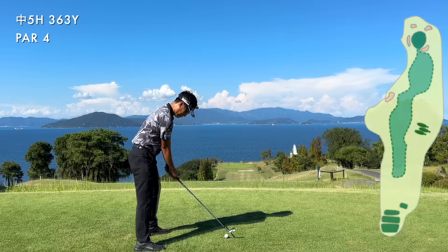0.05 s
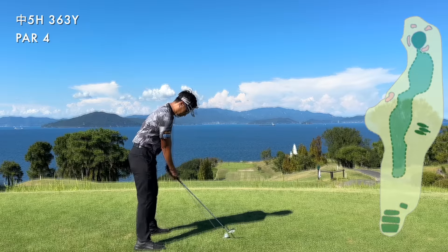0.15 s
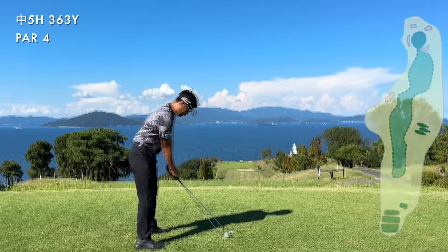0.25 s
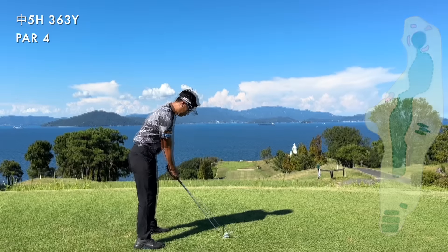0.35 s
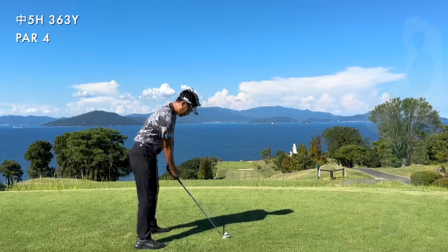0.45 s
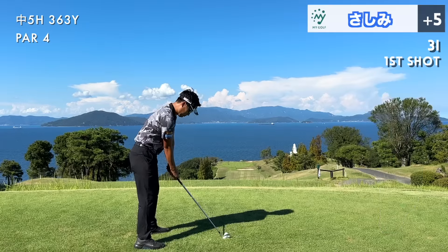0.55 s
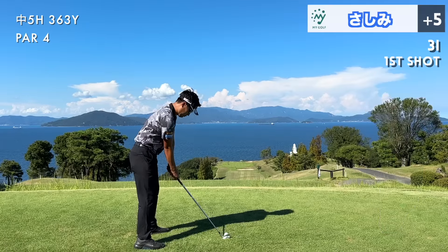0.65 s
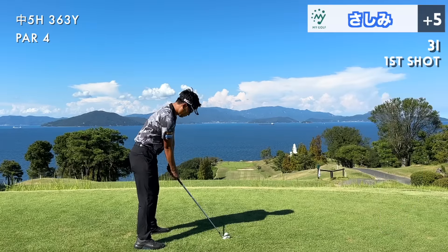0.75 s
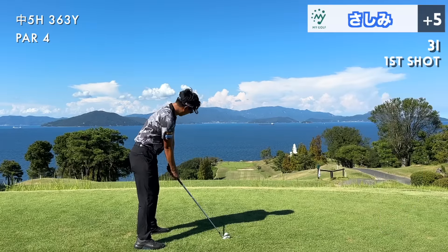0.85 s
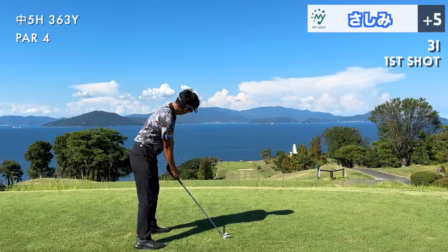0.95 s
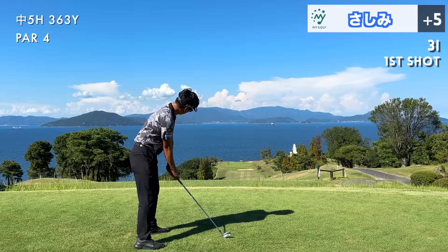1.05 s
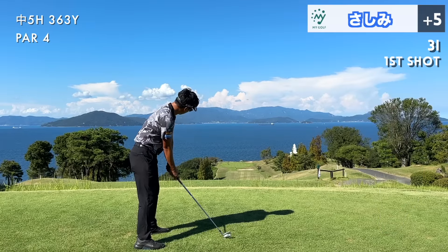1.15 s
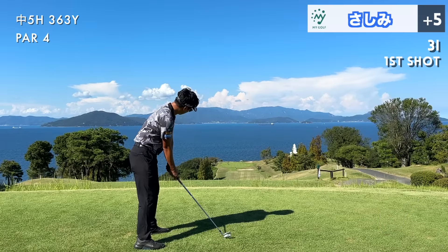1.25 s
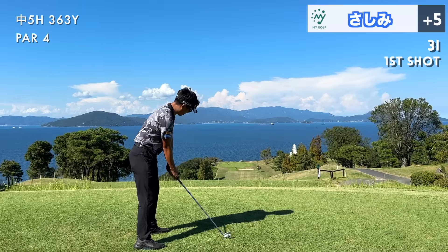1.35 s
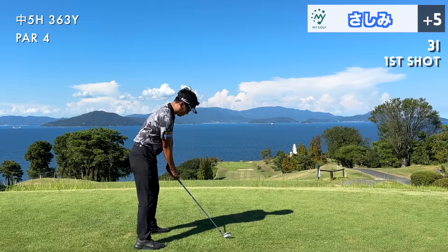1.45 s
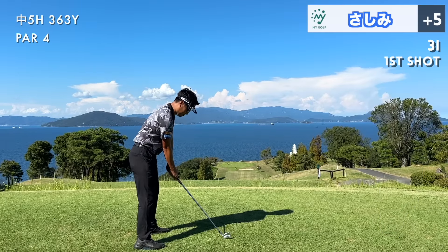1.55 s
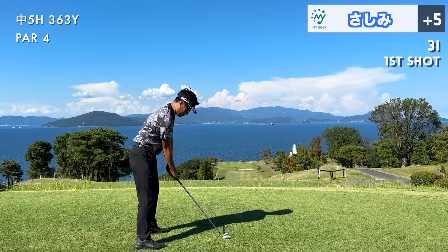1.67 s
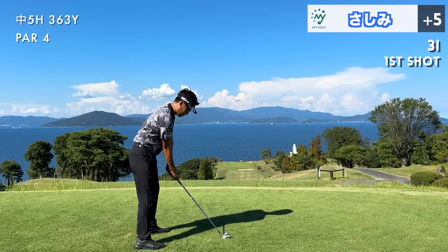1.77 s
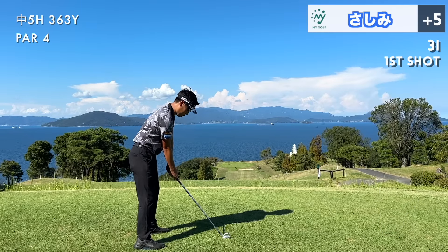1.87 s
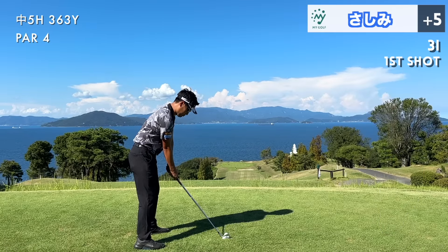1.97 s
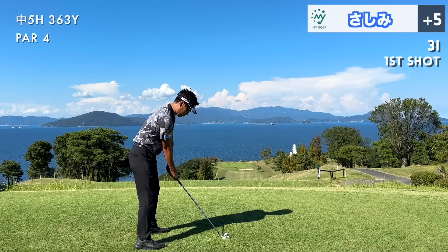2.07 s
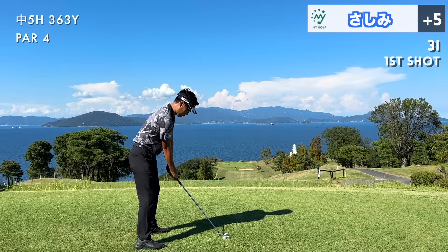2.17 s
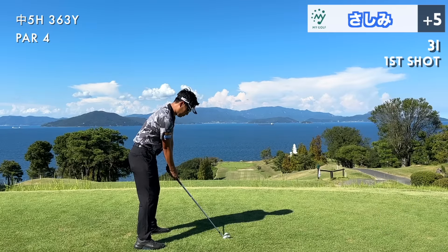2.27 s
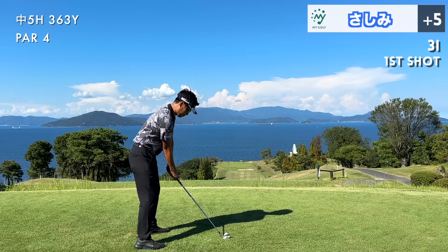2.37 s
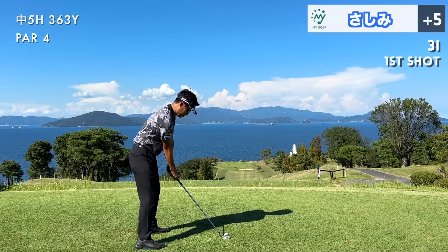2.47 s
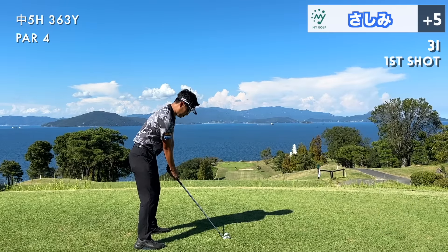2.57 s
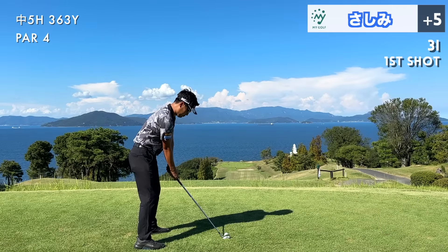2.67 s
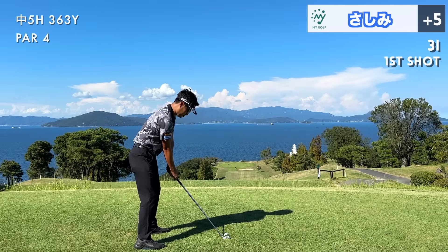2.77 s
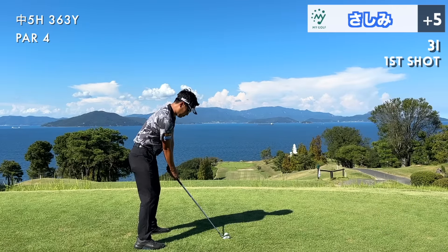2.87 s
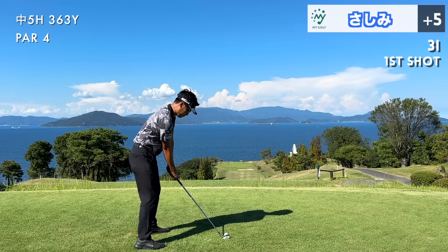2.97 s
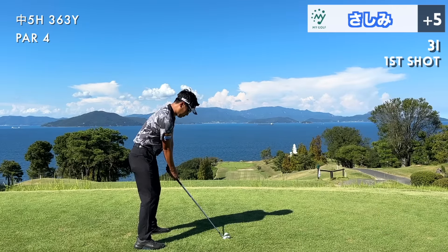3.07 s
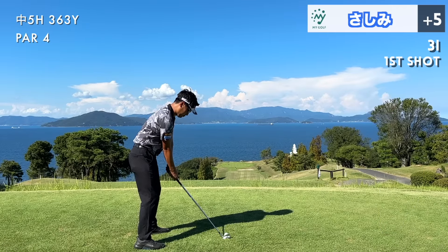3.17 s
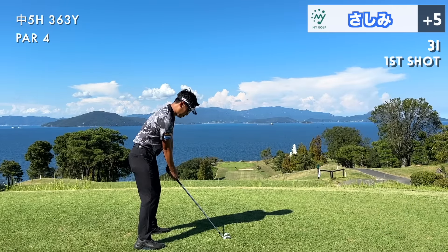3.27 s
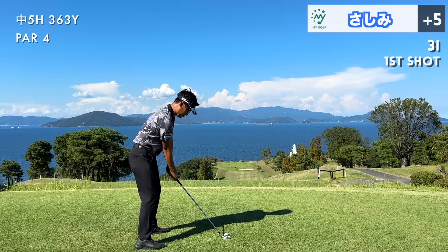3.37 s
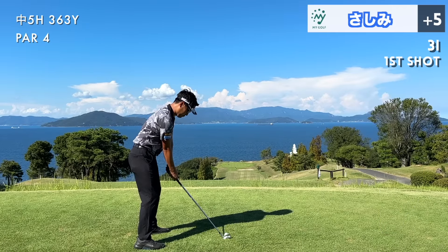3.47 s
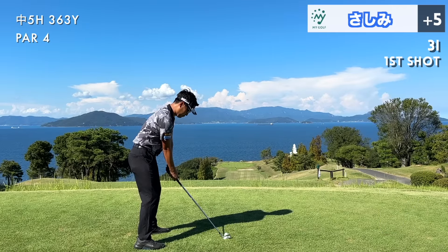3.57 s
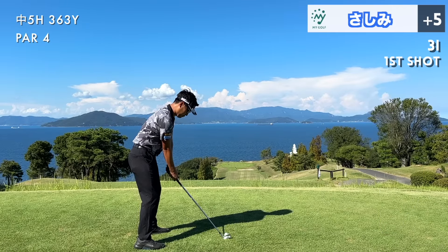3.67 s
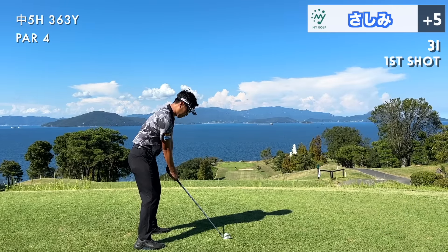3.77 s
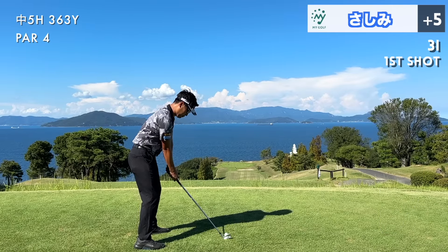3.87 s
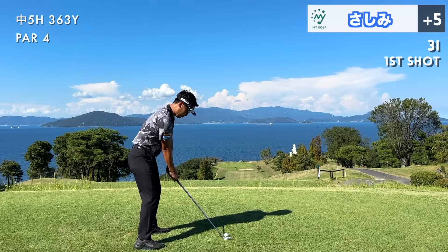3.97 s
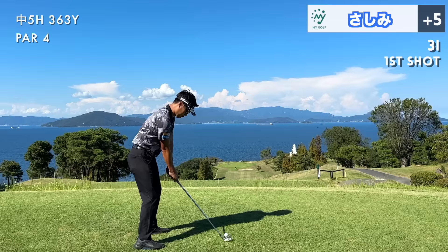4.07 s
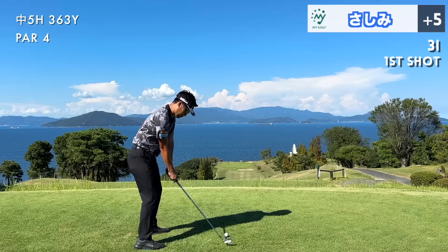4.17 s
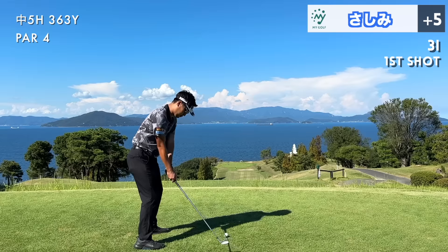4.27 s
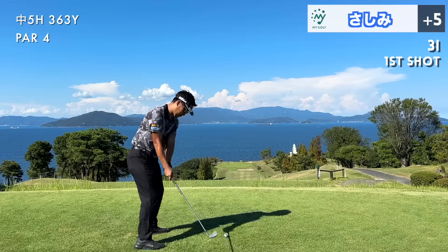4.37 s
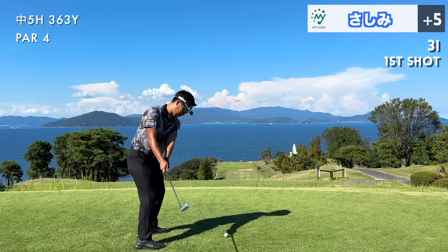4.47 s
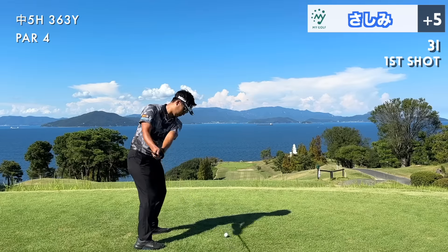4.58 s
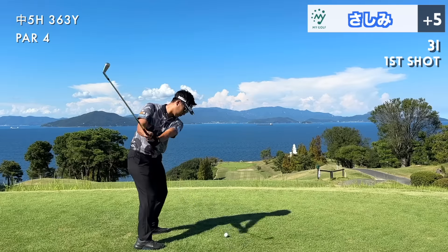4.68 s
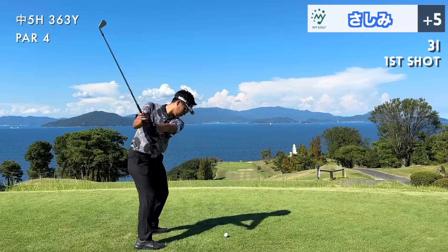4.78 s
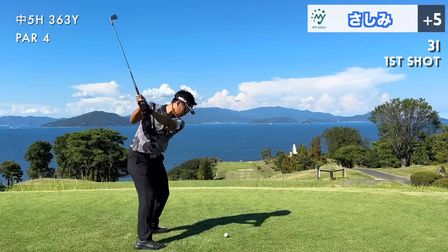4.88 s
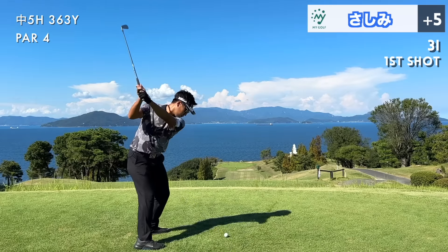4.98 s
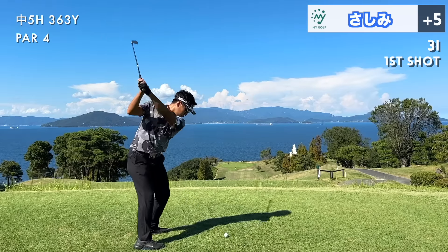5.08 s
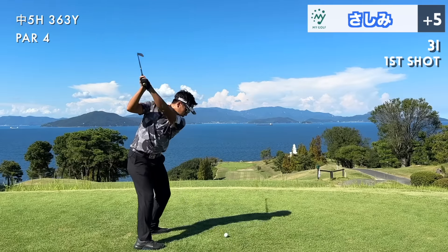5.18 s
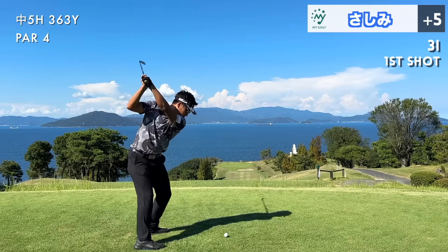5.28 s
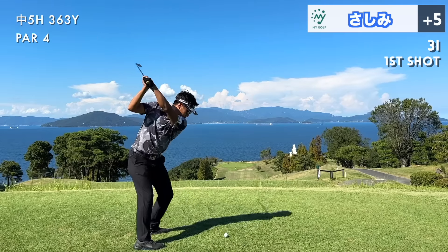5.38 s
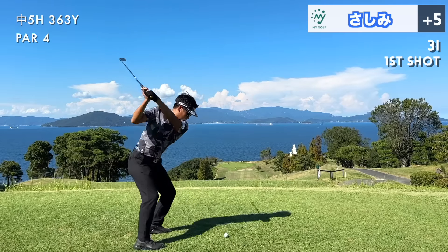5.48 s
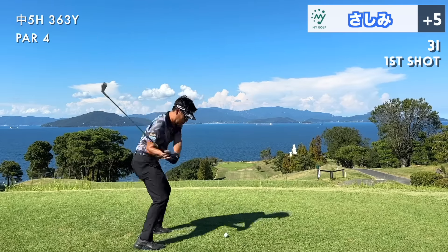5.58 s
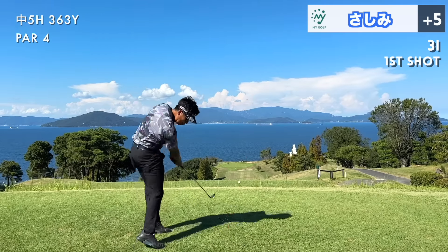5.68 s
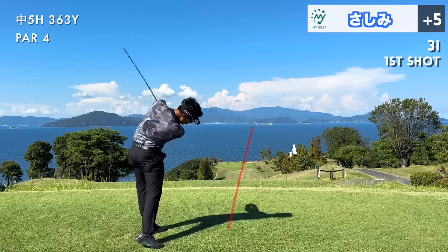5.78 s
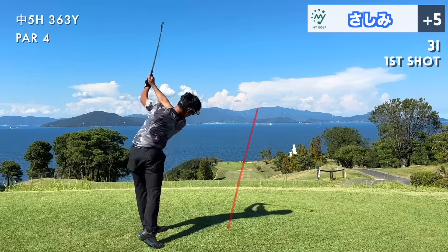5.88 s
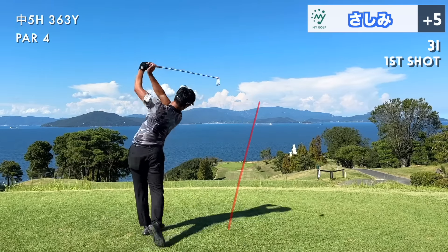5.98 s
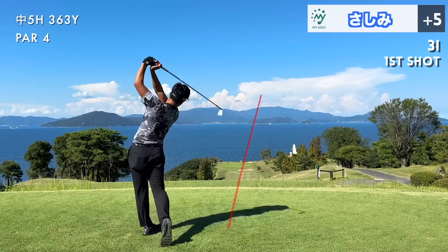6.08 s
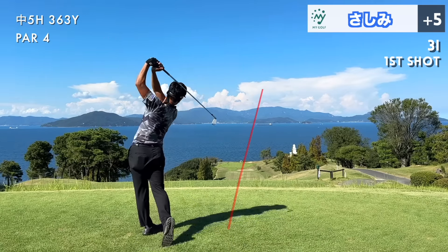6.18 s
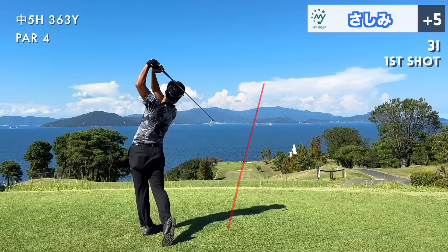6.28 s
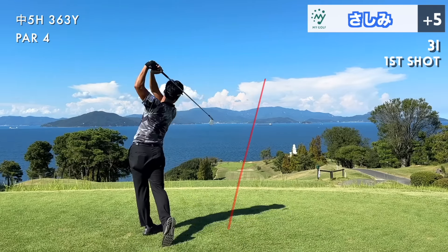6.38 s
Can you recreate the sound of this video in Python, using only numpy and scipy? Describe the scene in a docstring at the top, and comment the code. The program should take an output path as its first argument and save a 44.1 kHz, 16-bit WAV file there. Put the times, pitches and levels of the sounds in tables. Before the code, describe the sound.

Wind buffets the microphone outdoors until a golf club swishes down and hits the ball with one sharp, loud crack.

```python
"""An iron strikes a golf ball on a seaside tee: the ball knocks and the steel head rings under a crack
that overloads the microphone, and turf sprays. Leading in, clothes rustle through the backswing, then the
shaft swishes and the head whistles as they shed vortices. Gusts buffet the microphone throughout, over
a faint wash of sea and leaves and insects chirping in the grass."""
import sys
import numpy as np
from scipy import signal
from scipy.fft import rfft, irfft, next_fast_len
from scipy.io import wavfile
from scipy.ndimage import uniform_filter1d

SR = 44100
rng = np.random.default_rng(int(sys.argv[2]) if len(sys.argv) > 2 else 0)


def wrap_up_sound(samples):
    """Save the sound to the file named by the first command line argument, as 16-bit audio."""
    columns = np.atleast_2d(samples).T
    # keep every value between -1 and 1, then stretch to whole-number steps
    tamed = np.clip(columns, -1, 1)
    steps = np.round(tamed * 32767).astype(np.int16)
    wavfile.write(sys.argv[1], SR, steps)


N = 283783
TIME = np.arange(N) / SR
CONTACT_S, RELEASE_S = 5.6877, 5.6886   # the face meets the ball; the ball leaves it


def from_db(db):
    """Decibels to gain."""
    return 10 ** (np.asarray(db) / 20)


def rms_one(x):
    """Scale to unit rms."""
    return x / np.sqrt(np.mean(x ** 2) + 1e-20)


def drift(rate_hz):
    """Smooth random modulation, rms 1."""
    step, warm_up = 40, 2000
    pole = np.exp(-2 * np.pi * rate_hz * step / SR)
    noise = rng.standard_normal(N // step + warm_up + 2)
    slow = signal.lfilter([1], [1, -2 * pole, pole * pole], noise)[warm_up:]
    return np.interp(np.arange(N) / step, np.arange(len(slow)), rms_one(slow))


def coloured_noise(spectrum):
    """Noise with the given spectrum, falling steeply beyond its ends; rms 1."""
    hz, db = np.transpose(spectrum)
    size = next_fast_len(N)
    f = np.maximum(np.fft.rfftfreq(size, 1 / SR), 1)
    roll_off = np.minimum(1, np.minimum(f / hz[0], hz[-1] / f)) ** 3
    gain = from_db(np.interp(np.log(f), np.log(hz), db)) * roll_off
    return rms_one(irfft(gain * rfft(rng.standard_normal(size)), size)[:N])


def resonant_noise(hz, width_hz, envelope=1):
    """Enveloped noise through one band; rms about 1 where the envelope is 1."""
    low = np.sqrt(hz ** 2 + (width_hz / 2) ** 2) - width_hz / 2
    band = signal.butter(2, [low, min(low + width_hz, SR / 2 - 1)], "band", fs=SR, output="sos")
    return np.sqrt(SR / 2 / width_hz) * signal.sosfilt(band, envelope * rng.standard_normal(N) + 1e-18)


def evened(x, span_s):
    """Hold a signal's running rms near one."""
    return x / np.sqrt(uniform_filter1d(x * x, max(int(span_s * SR), 2)) + 1e-9)


def decay(start, t60):
    """Envelope that jumps to one and dies away."""
    age = TIME - start
    return (age >= 0) * from_db(-60 * np.clip(age / t60, 0, 4))


def swell(centre, half_length):
    """Bell-shaped envelope of height one."""
    return np.exp(-np.minimum(((TIME - centre) / half_length) ** 2, 50))


def arch_db(start, end, rise_db_per_s, fall_db_per_s):
    """Envelope in dB: a steady rise to 0, a hold from start to end, a steady fall."""
    attack = rise_db_per_s * np.maximum(start - TIME, 0)
    release = fall_db_per_s * np.maximum(TIME - end, 0)
    return np.maximum(-attack - release, -200)


def arches(rows):
    """Gain of several rise-hold-fall envelopes, summed in power."""
    gains = (from_db(db + arch_db(start, end, rise, fall)) for start, end, db, rise, fall in rows)
    return np.sqrt(sum(gain ** 2 for gain in gains))


def open_air(air_db, drone_db, buzz_db, trill_db):
    """Distant sea and leaves, a faint narrow drone, the trill of far insects and one short high buzz."""
    # wash of sea and leaves (frequency [Hz], level [dB])
    air_spectrum = [(100, 7), (400, 2.5), (800, -3), (1300, -10.5), (2000, -13.5), (3000, -19),
                    (5000, -23.5), (9000, -25), (15500, -27)]
    # rise and fall of the far drone (time [s], level [dB])
    drone_curve = [(0.1, -70), (0.35, -77), (2.5, -79), (4.9, -75), (5.35, -63), (5.8, -84)]
    drone_gain = from_db(np.interp(TIME, *np.transpose(drone_curve)) + drone_db)
    drone = drone_gain * resonant_noise(1510, width_hz=150)
    trill = from_db(trill_db) * resonant_noise(6900, width_hz=350)
    buzz = from_db(buzz_db) * swell(.6, 0.16) * resonant_noise(11500, width_hz=500)
    return from_db(air_db) * coloured_noise(air_spectrum) + drone + trill + buzz


def insects(top_hz, fall_hz, length_s, chirp_db, overtone_db, chorus_db, chorus_gap_s, count):
    """A near insect gives short falling chirps, gradually slowing; far ones answer, fainter and lower."""
    first_s, gap_s, gap_growth_s = 0.472, 0.2765, 0.0023
    answers = .25 + np.cumsum(chorus_gap_s * rng.uniform(.4, 1.6, size=90))
    far = [(s, chorus_db + rng.normal(0, 2.3), rng.normal(6980, 70)) for s in answers]
    near = [(first_s + k * (gap_s + gap_growth_s * (k - 1) / 2), chirp_db, top_hz) for k in range(count)]
    age = np.arange(int(2 * length_s * SR)) / SR
    progress = age / length_s - .5
    chirps = np.zeros(N + len(age))
    for s, db, hz in near + far:
        quaver_hz = 40 * np.sin(2 * np.pi * (rng.uniform(150, 300) * age + rng.random()))
        phase = 2 * np.pi * np.cumsum(hz - fall_hz * progress + quaver_hz) / SR
        tone = np.sin(phase) + from_db(overtone_db) * np.sin(2 * phase)
        envelope = from_db(db) * np.exp(-((progress - .4) / 0.5) ** 2)
        start = min(int((s - length_s / 2) * SR), N)
        chirps[start:start + len(age)] += envelope * tone
    return chirps[:N]


def wind(lumpy_db, buffet_db, thud_db, gusty_db):
    """Big eddies heave and rumble on the microphone port; in gusts small ones flutter above them."""
    # wind strength at the microphone (time [s], level [dB])
    strength_curve = [(0.0, -44), (0.2, -52), (0.39, -47), (0.55, -53), (0.66, -43), (1.02, -46),
                      (1.22, -39), (1.59, -42), (1.84, -36), (2.02, -51), (2.27, -36), (2.61, -44),
                      (2.81, -57), (3.11, -39), (3.44, -36), (3.65, -48), (3.97, -38), (4.01, -44),
                      (4.3, -39), (4.48, -60), (4.62, -55), (4.67, -38), (4.73, -47), (4.89, -36),
                      (4.91, -49), (4.98, -40), (5.05, -55), (5.1, -41), (5.3, -37), (5.44, -48),
                      (5.53, -35), (5.68, -42), (5.78, -56), (5.84, -40), (5.91, -35), (5.94, -48),
                      (6.03, -38), (6.11, -62), (6.32, -39), (6.43, -54)]
    # sub-bass of large eddies (frequency [Hz], level [dB])
    heave_spectrum = [(20, -1), (33, 0.5), (60, -2), (80, -14), (120, -35.5)]
    # bass of medium eddies (frequency [Hz], level [dB])
    rumble_spectrum = [(58, -3), (68, -0.5), (90, -2), (125, -3.5), (180, -9), (260, -20), (500, -46)]
    # low mids of small eddies (frequency [Hz], level [dB])
    flutter_spectrum = [(90, -17), (160, -2), (230, 2), (330, -5.5), (480, -12.5), (700, -21.5),
                        (1100, -29.5), (2000, -52), (4000, -59)]
    # thuds of single big eddies (time [s], level [dB])
    thud_cues = [(0.8, -37), (1.34, -32.5), (1.6, -28.5), (1.84, -34), (3.16, -32.5), (3.44, -31.5),
                 (3.92, -34), (4.99, -36), (5.55, -33), (6.28, -32)]
    # single hard buffets (time [s], level [dB], half-length [s])
    buffet_cues = [(1.358, -44, 0.0091), (1.822, -35.5, 0.011), (2.247, -47, .025), (3.393, -40, 0.004),
                   (3.442, -37, 0.0052), (4.874, -40, .006), (5.9, -38.5, .014)]
    # gusts breaking up into brighter flutter (start [s], end [s], level [dB])
    flurry_cues = [(0.05, 0.08, -52), (1.24, 1.47, -50), (2.2, 2.26, -44), (2.4, 2.53, -46),
                   (3.14, 3.32, -45), (4.22, 4.3, -48), (5.11, 5.2, -50)]
    reference_db, heave_db, rumble_db, flutter_db = -38, -37.2, -37, -48.7
    flurry_rise_db_per_s, flurry_fall_db_per_s = 120, 100
    gust_db = np.interp(TIME, *np.transpose(strength_curve)) - reference_db + gusty_db * drift(8)
    lumps = from_db(lumpy_db * drift(35))   # one passing eddy shakes rumble and flutter together
    thuds = sum(from_db(db + thud_db) * swell(s, half_length=.045) for s, db in thud_cues)
    buffets = sum(from_db(db + buffet_db) * swell(s, half) for s, db, half in buffet_cues)
    flurries = arches([(*cue, flurry_rise_db_per_s, flurry_fall_db_per_s) for cue in flurry_cues])
    # the smaller the eddies, the more they follow the gusts
    heave_gain = np.hypot(from_db(heave_db + .6 * gust_db), thuds)
    rumble_gain = from_db(rumble_db + gust_db)
    flutter_gain = np.hypot(from_db(flutter_db + 1.08 * gust_db), np.hypot(flurries, buffets))
    heave = heave_gain * evened(coloured_noise(heave_spectrum), span_s=0.14)
    rumble = rumble_gain * evened(coloured_noise(rumble_spectrum) * lumps, span_s=.07)
    flutter = flutter_gain * evened(coloured_noise(flutter_spectrum) * lumps, span_s=.05)
    return heave + rumble + flutter


def clothes(rustle_db, grain_db, sleeve_db):
    """Fabric slides as the body turns, with a few quicker brushes; the sleeves hiss as the arms go up."""
    # rustle of sliding fabric (frequency [Hz], level [dB])
    cloth_spectrum = [(700, -0.5), (1200, -0.5), (2000, -4.5), (3200, -7), (5000, -9.5), (8000, -13.5),
                      (12500, -14.5), (15500, -23.5)]
    # hiss of the sleeves (frequency [Hz], level [dB])
    sleeve_spectrum = [(2500, -17), (5000, -4), (8500, -0.5), (11000, -3.5), (15500, -19)]
    # backswing, then downswing (start [s], end [s], level [dB], rise [dB/s], fall [dB/s])
    moves = [(4.61, 5.45, -64.8, 50, 11), (5.55, 5.62, -53.5, 110, 78)]
    # quick brushes of sleeve and shoe (time [s], level [dB], half-length [s])
    brush_cues = [(0.06, -73, 0.019), (0.872, -75, 0.033), (4.602, -72, .012), (5.567, -47, 0.012),
                  (5.875, -61, 0.011), (5.913, -57, 0.0082), (6.041, -66, 0.0092), (6.192, -68, 0.012),
                  (6.343, -72, .008)]
    brushes = sum(from_db(db) * swell(s, half) for s, db, half in brush_cues)
    fabric = rms_one(coloured_noise(cloth_spectrum) * from_db(grain_db * drift(120)))
    shirt = (from_db(rustle_db) * arches(moves) + brushes) * fabric
    sleeves = from_db(sleeve_db) * swell(5.12, .27) * coloured_noise(sleeve_spectrum)
    return shirt + sleeves


def ticks(gain_db):
    """Each small contact is a dying burst of noise in one resonance."""
    # clicks and scrapes of grip, grass and soil (time [s], level [dB], centre [Hz], width [Hz], t60 [s])
    contacts = [(0.125, -64, 6500, 9000, 0.95), (0.125, -74.5, 4600, 150, 0.65),
                (0.286, -48.5, 1200, 7500, .009), (1.469, -58, 1500, 1800, .012),
                (3.881, -51.5, 3630, 900, 0.016), (3.8811, -64, 7000, 3000, 0.066),
                (3.8924, -53.5, 2600, 1400, 0.013), (5.6518, -34, 2880, 908, 0.012),
                (5.7164, -39, 10000, 4000, .01), (5.7205, -42, 9800, 3000, .01),
                (5.7234, -42, 9000, 3000, 0.014)]
    bursts = (from_db(db) * resonant_noise(hz, width, decay(s, t60)) for s, db, hz, width, t60 in contacts)
    return from_db(gain_db) * sum(bursts)


def turf(cut_db, cut_t60, spray_db, spray_t60, grain_db):
    """The sole cuts through the grass and throws up a grainy spray."""
    # tearing turf (frequency [Hz], level [dB])
    turf_spectrum = [(300, -5.5), (550, 1.5), (900, -7.5), (2000, -1), (3200, -7), (5000, -13), (9000, -12),
                     (12500, -15), (15500, -11)]
    cut = from_db(cut_db) * decay(RELEASE_S, cut_t60)
    spray = from_db(spray_db) * decay(RELEASE_S, spray_t60)
    grains = coloured_noise(turf_spectrum) * from_db(grain_db * drift(400))
    return (cut + spray) * evened(grains, span_s=.006)


def shaft_swish(shaft_db, bite_db):
    """The shaft sheds vortices at all pitches; its fast end opens the swish with a narrower bite."""
    # air rushing round the shaft (frequency [Hz], level [dB])
    shaft_spectrum = [(300, -4.5), (550, 0), (800, -1.5), (1170, 2), (1700, -5.5), (2700, -8),
                      (4100, -19.5), (7000, -22.5), (11000, -25.5), (15500, -32)]
    # sweeps on the way down and into the ball (start [s], end [s], level [dB], rise [dB/s], fall [dB/s])
    sweeps = [(5.518, 5.54, -30.5, 410, 520), (5.674, 5.687, -41.5, 290, 1300)]
    rush = from_db(shaft_db) * arches(sweeps) * coloured_noise(shaft_spectrum)
    bite_envelope = swell(5.502, 0.014) + from_db(-17.5) * swell(5.47, .05)
    return rush + from_db(bite_db) * resonant_noise(1260, width_hz=450, envelope=bite_envelope)


def head_whistle(whistle_db, wander, turbulence):
    """The head sheds one ragged, throbbing tone that climbs as it speeds up and drops as it goes by."""
    top_s, top_hz, climb_octaves_per_s, drop_octaves_per_s = 5.677, 770, 20, 25
    loudest_s, throb_period_s, throb_depth_db = 5.683, .02, 4
    past_top = TIME - top_s
    hz = top_hz * 2 ** np.minimum(climb_octaves_per_s * past_top, -drop_octaves_per_s * past_top)
    envelope_db = arch_db(loudest_s, loudest_s, rise_db_per_s=290, fall_db_per_s=900)
    throb_db = throb_depth_db * np.cos(2 * np.pi * (TIME - loudest_s) / throb_period_s)
    phase = 2 * np.pi * np.cumsum(hz * (1 + wander * drift(150))) / SR
    tone = np.sin(phase) + turbulence * (drift(220) * np.sin(phase) + drift(220) * np.cos(phase))
    return from_db(whistle_db + envelope_db + throb_db) * evened(tone, span_s=.01)


def strike(ring_db, crack_db, crack_t60, scuff_db):
    """The squeezed ball knocks and scuffs up the face; the steel head rings under a bright crack."""
    # the ball's knock, a few cycles long (frequency [Hz], level [dB], half-length [s])
    knock_pulses = [(660, -12, 0.0013), (1580, -12, .0007), (2480, 5.5, 0.00053)]
    # modes of the club head (frequency [Hz], level [dB], t60 [s])
    head_modes = [(1184, -23.5, .014), (1620, -11, 0.012), (2010, -23, .016), (2560, -19, .012),
                  (3180, -13, 0.011), (3900, -18, 0.0095), (4400, -15.5, 0.0091), (4757, -17, .008),
                  (5180, -22.5, 0.011), (6540, -20, .009), (7160, -19.5, 0.0099), (7950, -18, .008),
                  (8820, -18.5, 0.0082), (9700, -19, .006), (10230, -15, .006), (12500, -13, .006),
                  (13050, -16, .005), (13900, -22, .006)]
    # bright noise of the impact (frequency [Hz], level [dB])
    crack_spectrum = [(900, -9.5), (1700, -3), (3500, 0), (5500, -2.5), (8000, -4), (12500, -7),
                      (14000, -14), (15500, -24.5)]
    knock = sum(from_db(db) * swell(CONTACT_S, half) * np.sin(2 * np.pi * hz * (CONTACT_S - TIME))
                for hz, db, half in knock_pulses)
    ring = np.zeros(N)
    for k, (hz, db, t60) in enumerate(head_modes):
        tone = (-1) ** k * np.sin(2 * np.pi * hz * (TIME - RELEASE_S))   # alternating polarity
        ring += from_db(db) * decay(RELEASE_S, t60) * tone
    scuff = from_db(scuff_db) * swell(CONTACT_S, 0.00065)
    crack = from_db(crack_db) * decay(RELEASE_S, crack_t60)
    noise = evened(coloured_noise(crack_spectrum), span_s=0.00087)
    return knock + from_db(ring_db) * ring + (scuff + crack) * noise


def scene():
    """The shot and its surroundings, mixed in mono."""
    gusts = wind(lumpy_db=1.7, buffet_db=-1.0, thud_db=0.5, gusty_db=0.5)
    coast = open_air(air_db=-64, drone_db=-4.0, buzz_db=-87, trill_db=-96)
    chirps = insects(top_hz=7170, fall_hz=200, length_s=0.019, chirp_db=-64, overtone_db=-19,
                     chorus_db=-83.5, chorus_gap_s=0.05, count=14)
    golfer = clothes(rustle_db=1.5, grain_db=1.5, sleeve_db=-66) + ticks(gain_db=-5.5)
    swish = shaft_swish(shaft_db=-1.5, bite_db=-40)
    whistle = head_whistle(whistle_db=-30.5, wander=.04, turbulence=0.47)
    hit = strike(ring_db=4.0, crack_db=-12, crack_t60=.011, scuff_db=-13)
    divot = turf(cut_db=-26.5, cut_t60=0.032, spray_db=-46, spray_t60=0.2, grain_db=7.0)
    return (gusts + coast + chirps + golfer + swish + whistle + hit + divot)[None, :]


def record(dry):
    """The crack overloads the input into soft clipping; a steep low-pass cuts the top."""
    ceiling, cutoff_hz = .93, 15700
    clipped = dry / (1 + (np.abs(dry) / ceiling) ** 6) ** (1 / 6)
    return signal.sosfilt(signal.ellip(10, .1, 80, cutoff_hz, fs=SR, output="sos"), clipped)


dry = scene()
out = record(dry)
wrap_up_sound(out)
```